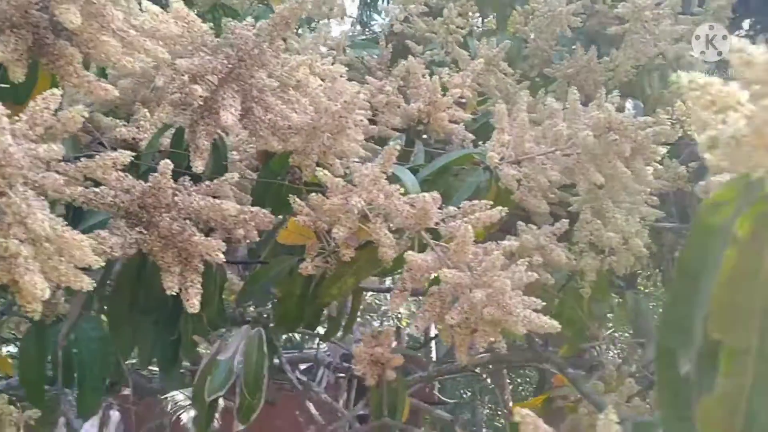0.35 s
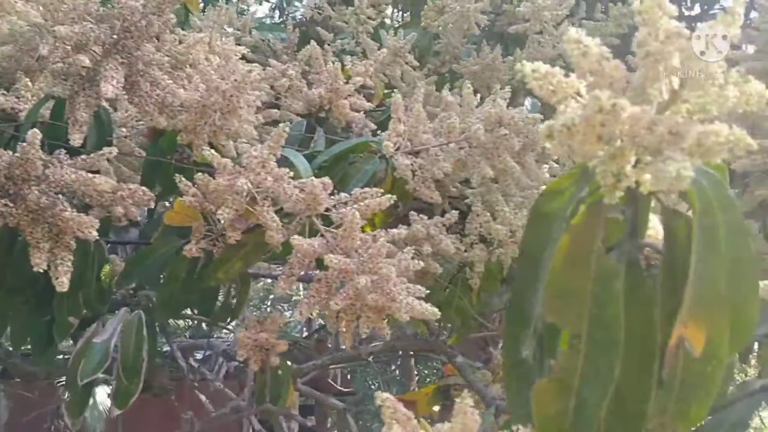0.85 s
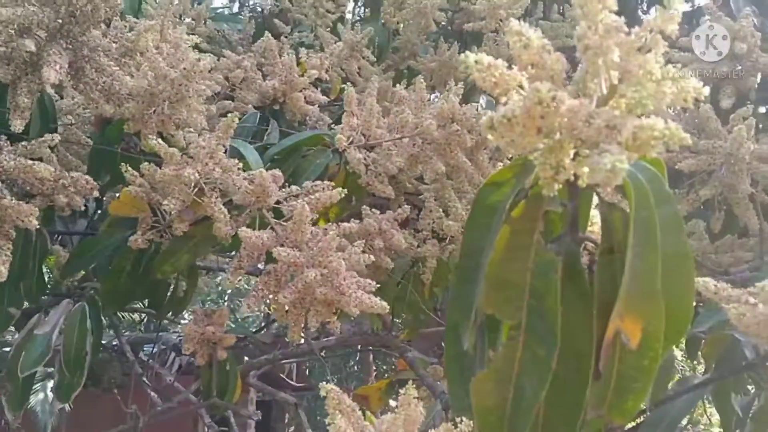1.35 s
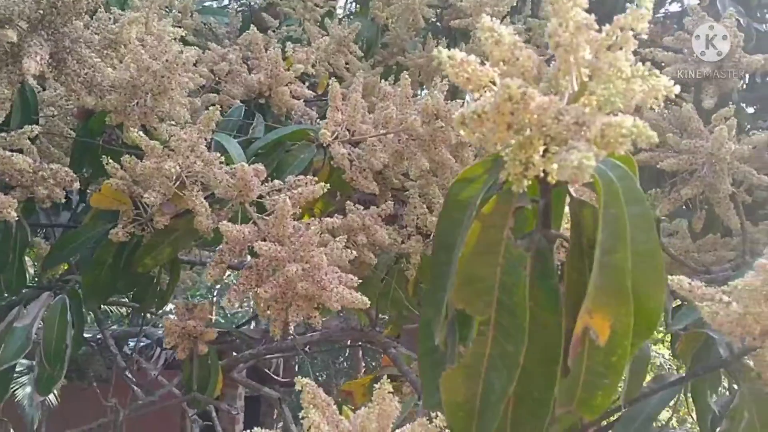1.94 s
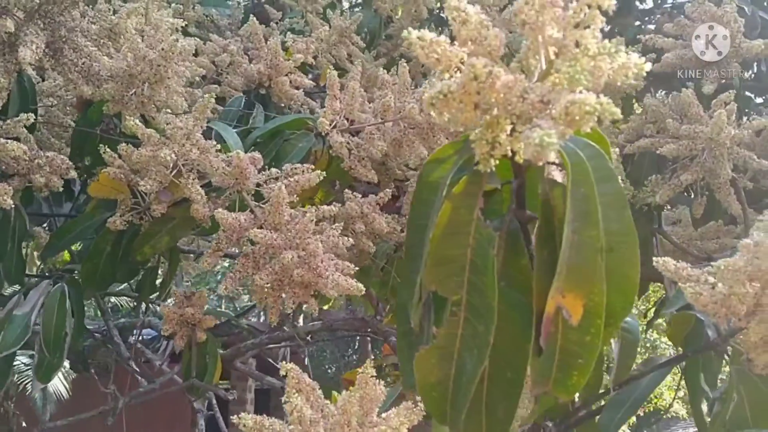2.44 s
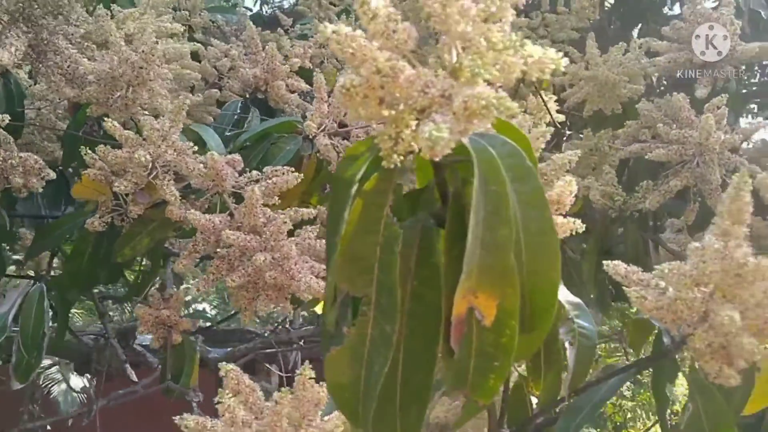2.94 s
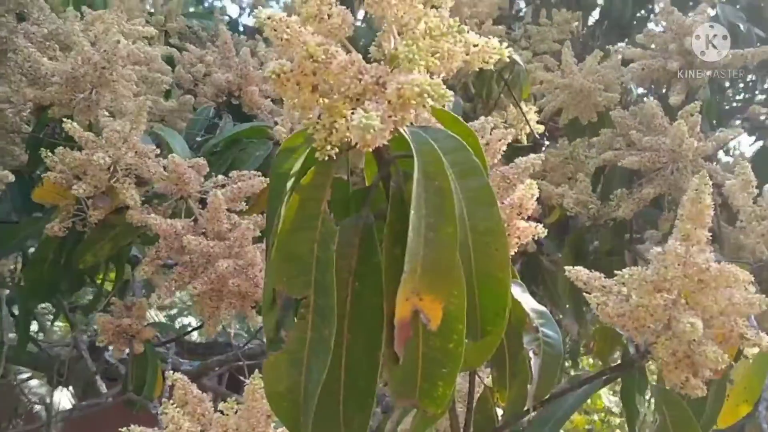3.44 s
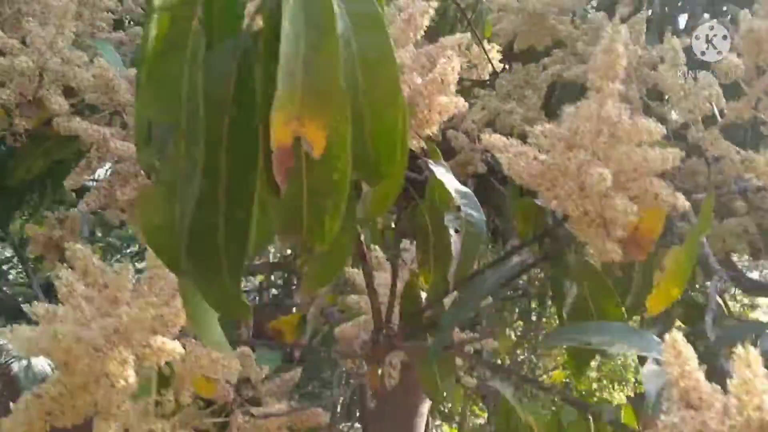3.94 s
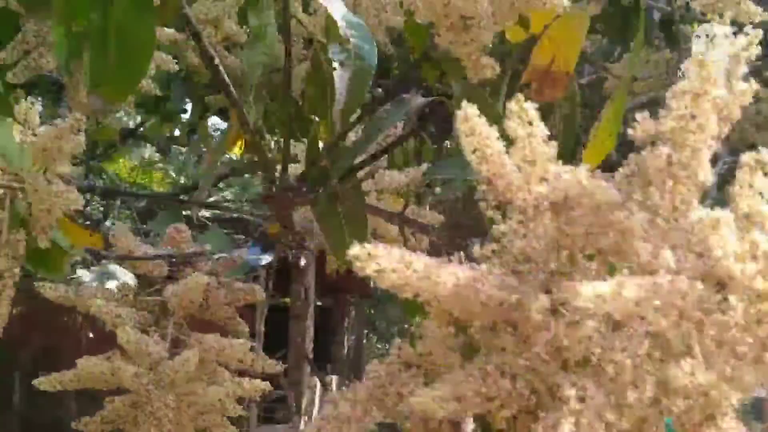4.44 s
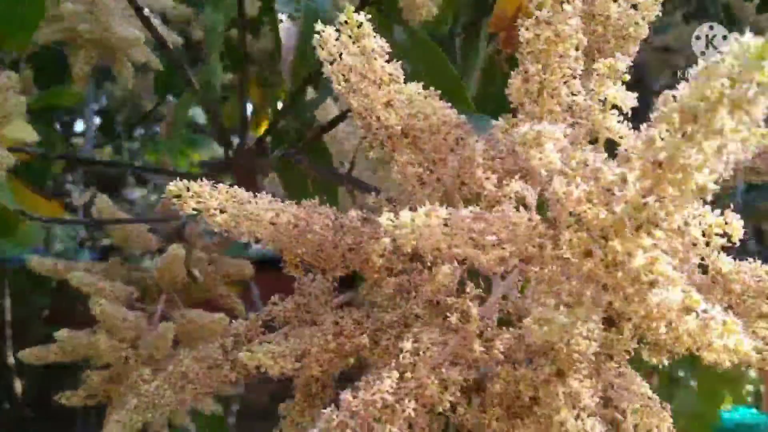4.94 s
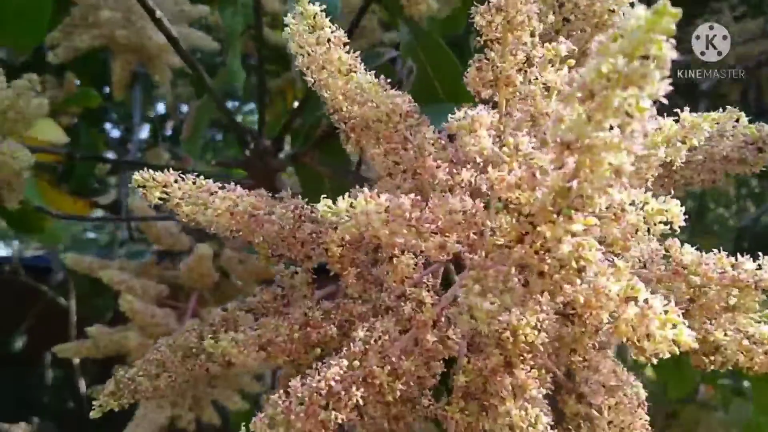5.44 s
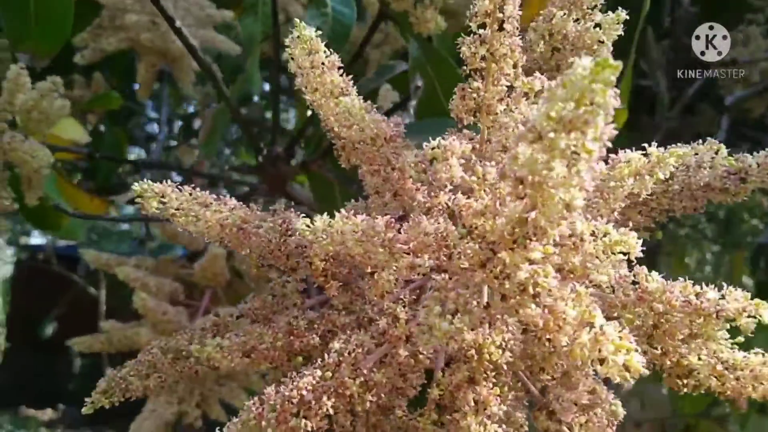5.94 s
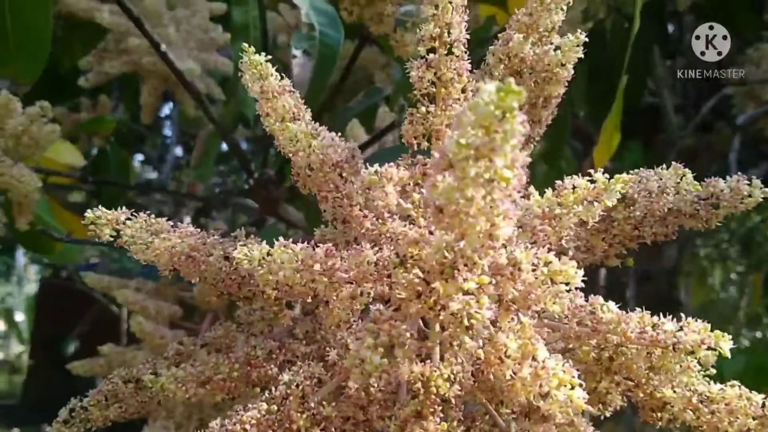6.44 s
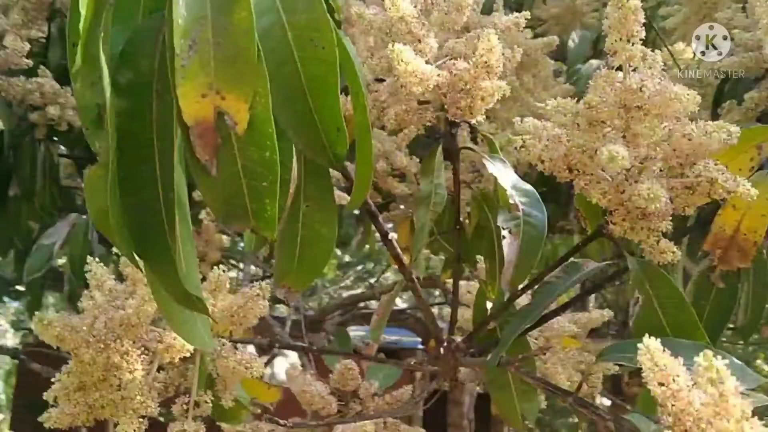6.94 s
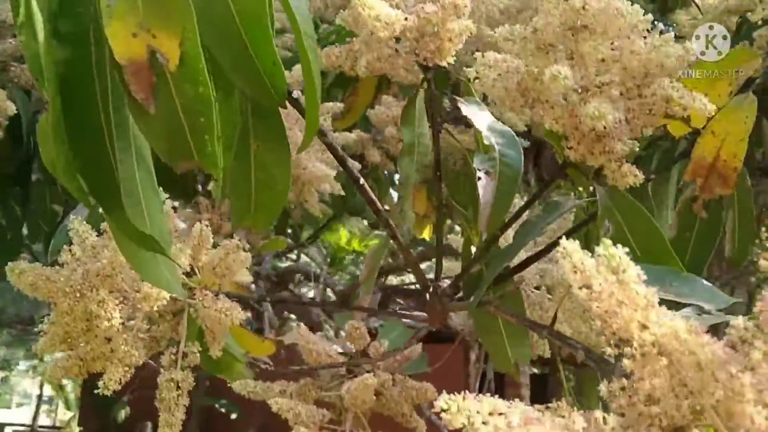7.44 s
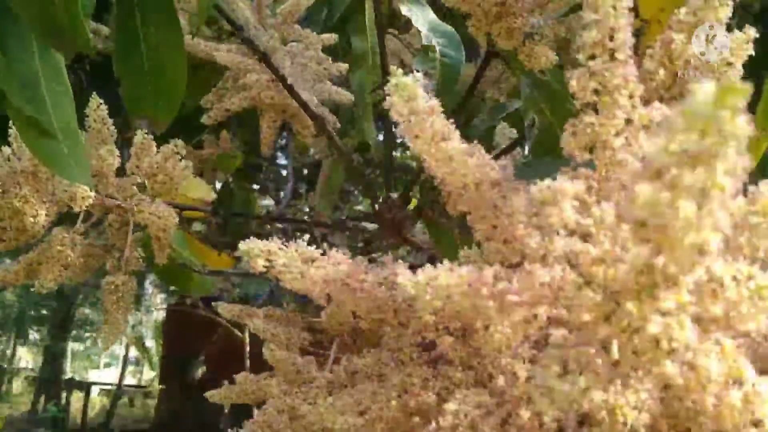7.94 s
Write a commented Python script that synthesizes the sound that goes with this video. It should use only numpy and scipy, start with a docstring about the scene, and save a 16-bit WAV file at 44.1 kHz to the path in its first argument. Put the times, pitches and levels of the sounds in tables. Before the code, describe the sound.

A leafy garden with a low airy wash, wavering far hum and soft wind puffs on the microphone. Distant crows caw, slow footsteps crunch over dry ground with small snaps, and thin high insects buzz in bouts. Small birds give quick arched phrases and falling chips. Near seven seconds everything cuts to silence briefly, then the air returns and a closer bird alternates rising whistles with sharp falling ticks.

```python
"""A garden with trees: small birds call over a far hum, insects, light wind and puffs on the microphone.
Crows caw far off (pulses ringing a throat) and feet crunch over dry ground (shaped noise and grains).
After a short silence the recorder starts again, nearer to a bird that swaps rising whistles with
falling ticks. Birds are near-sines on pitch curves; air, wind and insects are filtered noise."""
import sys
import numpy as np
from scipy import signal
from scipy.fft import rfft, irfft
from scipy.io import wavfile
from scipy.ndimage import uniform_filter1d

SR = 44100
rng = np.random.default_rng(int(sys.argv[2]) if len(sys.argv) > 2 else 0)


def store_wav(level_fs):
    """Save 16-bit WAV to argv[1]."""
    pcm = np.round(np.clip(np.atleast_2d(level_fs), -1, 1) * 32767)
    wavfile.write(sys.argv[1], SR, pcm.T.astype(np.int16))


def magnitude_from_level(level_db):
    """Linear magnitude for a level in decibels (20 dB per decade)."""
    exponent = np.asarray(level_db, float) / 20
    return 10 ** exponent


N = 356769
STOP_S, RESTART_S = 6.745, 7.048  # the recorder stops, then starts again


def evened(x):
    """Normalisation: scales to rms 1."""
    return x / np.sqrt(np.mean(x ** 2) + 1e-20)


def add(mix, s, sound):
    """Superposition: sums a sound into the mix from time s."""
    part = mix[round(s * SR):][:len(sound)]
    part += sound[:len(part)]


def columns(rows, t=None):
    """Linear interpolation: reads every column of a curve table at each sample."""
    s, *cols = np.transpose(rows)
    t = np.arange(s[0], s[-1], 1 / SR) if t is None else t
    return [np.interp(t, s, c) for c in cols]


def coloured(x, points):
    """Spectral filtering: weights a signal by a curve of f/Hz, level/dB."""
    f, db = np.transpose(points)
    hz = np.fft.rfftfreq(len(x), 1 / SR)
    curve_db = np.interp(np.log(hz + 1), np.log(f + 1), db)
    return irfft(rfft(x) * magnitude_from_level(curve_db), len(x))


def resonate(x, hz, width):
    """Moving resonance by heterodyning: shifts hz down to zero, smooths twice, shifts back."""
    turn = np.exp(2j * np.pi * np.cumsum(hz * np.ones(len(x))) / SR)
    r = np.exp(-np.pi * width / SR)
    smooth = signal.lfilter([(1 - r) ** 2], [1, -2 * r, r * r], x / turn)
    return 2 * (turn * smooth).real


def wander(size, hz):
    """Low-passed random process of rms 1, slower than about hz."""
    noise = rng.standard_normal(size + SR)
    return evened(signal.lfilter(*signal.butter(2, hz, fs=SR), noise)[SR:])


def foliage(x, t60, wet_db):
    """Diffuse scattering: leaves and walls return sparse random reflections that decay."""
    t = np.arange(SR // 2) / SR
    hits = rng.choice([-1., 1.], len(t)) * (rng.random(len(t)) < .05)
    tail = hits * magnitude_from_level(-60 * t / t60) * (t > .004)
    return x + magnitude_from_level(wet_db) * signal.oaconvolve(x, tail / np.linalg.norm(tail))[:N]


def echoed(x, lag_s, db):
    """Specular reflection: a near wall returns one delayed copy."""
    lag = round(lag_s * SR)
    return x + magnitude_from_level(db) * np.r_[np.zeros(lag), x[:-lag]]


def whistle(hz, db, second_db=-200, third_db=-200):
    """Harmonic synthesis: a near-sine with soft ends and faint overtones."""
    phase = 2 * np.pi * np.cumsum(uniform_filter1d(hz, size=100)) / SR
    partials = enumerate([db, second_db, third_db], 1)
    tone = sum(magnitude_from_level(level) * np.sin(k * phase) for k, level in partials)
    return np.sqrt(2) * tone * signal.windows.tukey(len(hz), min(1, 260 / len(hz)))


def sing(shapes, times, second_db=-60, third_db=-60):
    """Frequency modulation: repeats a set of pitch curves, each time a shade sharp or flat."""
    pivot_hz = 4400  # the pitch that stays when the span shrinks
    overtone_db_per_octave = 38  # overtones fade as a note falls
    out = np.zeros(N)
    bends = 1 + 0.0018 * rng.standard_normal(len(times))
    for (s, level_db, *span), bend in zip(times, bends):
        for shape in shapes:
            hz, db = columns(shape)
            if span:
                hz = pivot_hz + span[0] * (hz - pivot_hz)
            overtone_db = db + overtone_db_per_octave * np.log2(hz / hz.max())
            note = whistle(bend * hz, db, overtone_db + second_db, overtone_db + third_db)
            add(out, s + shape[0][0], magnitude_from_level(level_db) * note)
    return out


# Spectra of the wash before the stop and after the restart: f/Hz, relative level/dB
AIR_SPECTRUM = [(20, -27), (60, -8), (130, -2.5), (240, -11), (400, -17), (600, -16), (1100, -17),
                (1800, -24), (2300, -23.5), (4200, -30), (5200, -36), (7000, -33.5), (9200, -30),
                (10700, -39), (15500, -37)]
AIR_AFTER_SPECTRUM = [(12, -2), (30, 8.5), (70, 0), (113, -4.5), (400, -10.5), (820, -13.5), (1100, -18.5),
                      (1380, -25), (2540, -27.5), (3200, -28), (4000, -36.5), (6000, -36), (7500, -32.5),
                      (9860, -39), (11000, -42.5), (15500, -39)]
# Drift of the wash before the stop: t/s, mean level/dB
AIR_LEVEL = [(0, -66), (.8, -65), (3.3, -64.5), (3.9, -65.5), (5.3, -64.5), (6.1, -67.5), (6.75, -66.5)]
# Swell of the wash after the restart: t/s, gain/dB
AFTER_SWELL = [(7.05, -4.5), (7.3, -5.5), (7.7, -2), (8.09, -2.5)]


def air(points, db):
    """Broadband ambience: far town and leaves as shaped noise whose level drifts a little."""
    noise = coloured(rng.standard_normal(N), points)
    above = signal.sosfilt(signal.butter(4, 150, "high", fs=SR, output="sos"), noise)
    # the level counts only the sound above 150 Hz
    return magnitude_from_level(db + 1.58 * wander(N, 4.5)) * noise / np.std(above)


# Far hum: t/s, level/dB
HUM_LEVEL = [(0, -62), (4.4, -59.5), (5.2, -62.5), (6.75, -64.5)]
# Low puffs of air on the microphone: centre t/s, peak level/dB (of the force), half length to 1/e/s
PUFFS = [(.36, -58, .12), (1.02, -48, .06), (1.16, -55, .025), (1.31, -50, .035), (1.43, -54, .035),
         (2.19, -53, .08), (2.63, -49, .035), (2.76, -47, .04), (2.88, -55, .08), (3.16, -49, .035),
         (4.46, -51, .09), (4.565, -42, .03), (4.64, -48, .04), (4.74, -50, .035), (4.9, -56, .08),
         (5.62, -53, .06), (5.86, -55, .05), (6.1, -55, .12), (6.4, -54, .04), (6.64, -49, .07)]
# Thumps of air, one push and pull of the membrane: centre t/s, peak level/dB, width/s
THUMPS = [(2.06, -36, 0.0042), (4.574, -32.5, .007)]


def low_air_and_hum(t):
    """Turbulent pressure: a lumpy breeze, puffs and thumps on the microphone, and a wavering far hum."""
    hum_hz, breeze_db, lump_db, lump_hz = 116, -58.5, 3, 8
    lumps = coloured(rng.standard_normal(N), [(3, -20), (15, 2), (30, 2), (60, -5), (110, -13),
                                              (200, -26), (400, -55), (1000, -90)])
    force = magnitude_from_level(breeze_db + lump_db * wander(N, lump_hz))
    force = force + sum(magnitude_from_level(db) * np.exp(-((t - s) / half) ** 2) for s, db, half in PUFFS)
    thumps = np.zeros(N)
    for s, db, width in THUMPS:
        x = (t - s) / width
        thumps -= magnitude_from_level(db) * 2.35 * x * np.exp(-x ** 2)  # 2.35 brings the peak to 1
    hum = np.sin(2 * np.pi * np.cumsum(hum_hz + 3.58 * wander(N, 6.3)) / SR)
    hum = hum * (1 + 0.35 * wander(N, 12))
    return thumps + force * evened(lumps) + magnitude_from_level(columns(HUM_LEVEL, t)[0]) * evened(hum)


# Bouts of insect song: t/s, length/s, first level/dB, last level/dB (before waver), centre f/Hz
INSECT_BOUTS = [(0, 0.6, -73, -79, 9660), (0.69, 0.85, -78.5, -72.5, 9500), (1.893, 0.98, -80, -70, 9640),
                (2.98, 1.5, -73.5, -91, 9440), (3.956, 0.54, -85, -74, 9600), (4.546, 0.21, -80, -76, 9350),
                (4.9, 1.06, -75.5, -77, 9250), (6.005, 0.74, -78.5, -71.5, 9270),
                (7.107, 0.97, -84.5, -77.5, 9655)]


def insects(t):
    """Stridulation: fast noise pulses ring near 9 kHz, over a thin steady band below."""
    rest_db, edge_s, waver_db, drift_hz = -87.5, 0.1, 1.5, 120
    thin_hz, thin_db = 7190, -88  # a second, thinner insect
    starts, _, _, _, centres = np.transpose(INSECT_BOUTS)
    level = np.full(N, magnitude_from_level(rest_db))
    for s, length, first_db, last_db, _ in INSECT_BOUTS:
        edges = np.clip(np.minimum(t - s, s + length - t) / edge_s + .5, 0, 1)
        bout = edges * magnitude_from_level(first_db + (last_db - first_db) * (t - s) / length)
        level = np.maximum(level, bout)
    latest = np.maximum(np.searchsorted(starts, t) - 1, 0)
    hz = uniform_filter1d(centres[latest], size=4000) + drift_hz * wander(N, 2)
    turns = np.cumsum(140 * (1 + 0.064 * wander(N, 2.7))) / SR  # about 140 pulses a second
    gate = np.exp(-(turns % 1) / 0.43)
    buzz = evened(resonate((0.5 + gate) * rng.standard_normal(N), hz, 900))
    thin = evened(resonate(rng.standard_normal(N), thin_hz, 300))
    return level * magnitude_from_level(waver_db * wander(N, 4.44)) * buzz + magnitude_from_level(thin_db) * thin


# Far flock: t/s, gain/dB on the notes
FLOCK_GAIN = [(0, -106), (4.9, -100), (5.15, -86), (5.4, -84), (5.55, -87), (6.0, -87), (6.3, -97),
              (6.75, -94)]


def twitter(t):
    """Random superposition: a far flock of short rising notes around two pitches."""
    out, u = np.zeros(N), np.arange(600) / SR
    draws = rng.random((450, 4)) * [STOP_S, 700, 2, 6] + [-0.5, 4014, 0.0, 1.0]
    for s, hz, bend, db in draws:
        base_hz = 4200 if hz < 4350 else 4650
        glide_hz = base_hz + 0.5 * (hz % 350 - 175) + 12000 * bend * u
        add(out, s, whistle(glide_hz, db) * np.hanning(len(u)))
    flicker = 1 + .8 * wander(N, 120)
    return foliage(magnitude_from_level(columns(FLOCK_GAIN, t)[0]) * out * flicker, .25, -2)


# Caws: t/s, length/s, second-partial f/Hz before scoop and sag, level/dB before the envelope
# and the final gain, brightness/(dB per octave)
CAWS = [(.165, 0.27, 1294, -62.5, 2.5), (0.422, .11, 1249, -65, 5), (2.0, 0.29, 1269, -59.5, -4)]
# Resonances of the crow's open throat, before the brightness tilt: f/Hz, level/dB
CROW_THROAT = [(500, -40), (950, 3.5), (1200, 1.5), (1650, 4.5), (2250, -1), (2800, -11.5), (3500, -10.5),
               (4200, -20)]


def crow():
    """Source-filter voice: unsteady throbbing pulses pass through an open throat, far away."""
    scoop_depth, scoop_share, sag_depth = 0.3, .3, .17  # pitch scoops up from below, then sags
    start_db, end_db = -2, -1.5
    hoarse, throb, jitter = 0.42, .35, .022  # hoarse: share of rough pulses in the voice
    out = np.zeros(N)
    for s, length, top_hz, level_db, tilt in CAWS:
        t = np.arange(round(length * SR)) / SR
        n = len(t)
        scoop, sag = np.exp(-t / (scoop_share * length)), (t / length) ** 2.5
        hz = top_hz * (1 - scoop_depth * scoop - sag_depth * sag)
        db = level_db + start_db * scoop + end_db * sag
        turns = np.cumsum(hz / 2 * (1 + jitter * wander(n, 160))) / SR
        folds = sum(np.cos(2 * np.pi * k * turns) for k in range(1, 9)) * (1 + throb * wander(n, 90))
        rough = np.exp(-(turns % 1) / 0.097) * (1 + wander(n, 560))
        drive = (1 - hoarse) * evened(folds) + hoarse * evened(rough)
        throat = [(f, level + tilt * np.log2(f / 1400)) for f, level in CROW_THROAT]
        voice = evened(coloured(drive, throat))
        add(out, s, magnitude_from_level(db) * voice * signal.windows.tukey(n, .1))
    return foliage(magnitude_from_level(-2) * out, .3, -4)


# Rasping calls of a second crow: t/s, length/s, throat from f/Hz, to f/Hz, starting level/dB
RASPS = [(3.879, .23, 1520, 1860, -66.5), (4.785, .28, 1618, 1449, -65)]


def rasps():
    """Source-filter voice: ragged pulses ring a narrow throat, far away."""
    jitter, width_hz, low_width_hz, low_db = .2, 700, 300, -7
    air_noise, stutter_db, stutter_hz = .4, 1.5, 90  # the voice catches and lets go
    out = np.zeros(N)
    for s, length, from_hz, to_hz, db in RASPS:
        u = np.arange(round(length * SR)) / (length * SR)
        n = len(u)
        hz = from_hz + (to_hz - from_hz) * np.sqrt(u)
        turns = np.cumsum(hz / 3 * (1 + jitter * wander(n, 200))) / SR
        ragged = 1 + .6 * wander(n, 300) + air_noise * rng.standard_normal(n)
        drive = np.exp(-(turns % 1) / 0.13) * ragged
        drive = drive * magnitude_from_level(stutter_db * wander(n, stutter_hz))
        voice = resonate(drive, hz, width_hz)
        voice = voice + magnitude_from_level(low_db) * resonate(drive, hz * 2 / 3, low_width_hz)
        voice = evened(coloured(voice, [(600, -30), (900, 2.5), (2000, 1.5), (2600, -23)]))
        add(out, s, magnitude_from_level(db - 2.5 * u) * voice * signal.windows.tukey(n, .16))
    return foliage(out, .3, -3)


# Steps: t/s, heel level/dB, gravel level/dB (before their envelopes), delay of the gravel/s
STEPS = [(0.299, -63, -65.5, 0.11), (0.641, -83, -73, 0.04), (1.45, -64.5, -68, 0.081),
         (2.081, -61, -66, 0.21), (2.935, -60, -67, 0.098), (3.485, -56, -63, 0.12),
         (4.185, -57, -66.5, 0.12), (4.92, -54, -66.5, 0.12), (5.68, -59, -67.5, 0.14),
         (6.47, -59, -67.5, 0.15)]
# Spectrum of the heel's hiss: f/Hz, relative level/dB
HEEL_SPECTRUM = [(300, -23.5), (1400, 3.5), (2000, -6.5), (2600, 2), (3300, -6.5), (5000, -10.5),
                 (8000, -9.5), (12000, -13), (15500, -14.5)]
# Small dry snaps: t/s, level/dB before the decay, centre f/Hz
SNAPS = [(1.734, -75, 2170), (1.7579, -62, 6560), (1.9194, -59, 1230), (2.2744, -61.5, 1730),
         (2.2944, -76, 2360), (4.2844, -53, 1880), (4.5592, -58, 2700), (5.0583, -56, 2360),
         (5.8094, -60, 2200), (6.5546, -52, 1600)]


def steps():
    """Impact and granular noise: the heel hisses, then grit crunches, brighter as the foot rolls off."""
    out, t = np.zeros(N), np.arange(round(.45 * SR)) / SR
    n = len(t)
    for s, heel_db, gravel_db, delay in STEPS:
        hiss = evened(coloured(rng.standard_normal(n), HEEL_SPECTRUM))
        decay = 0.7 * np.exp(-t / 0.0081) + .5 * np.exp(-t / 0.13)
        heel = hiss * np.minimum(t / 0.014, 1) * magnitude_from_level(1.2 * wander(n, 80)) * decay
        sizes = magnitude_from_level(1.8 * np.minimum(rng.exponential(1, n), 3))
        # about 1300 grains a second
        grains = sizes * (rng.random(n) < 1300 / SR) * rng.choice([-1., 1.], n)
        roll = np.exp(-((t - delay) / np.where(t < delay, .05, .12)) ** 2)
        crunch = evened(resonate(grains, 1900 + 3000 * t, 950))
        gravel = crunch * roll * magnitude_from_level(2.3 * wander(n, 30))
        add(out, s, magnitude_from_level(heel_db) * heel + magnitude_from_level(gravel_db) * gravel)
    t = t[:400]
    for s, db, hz in SNAPS:
        ring = evened(resonate(rng.standard_normal(len(t)), hz, 0.73 * hz))
        add(out, s, magnitude_from_level(db) * ring * np.exp(-t / 0.0028))
    return out


# Single whistles of other birds, and at 4.69 s the low lead-in of the last rasping caw:
# t/s, length/s, from f/Hz, to f/Hz, level/dB at mid-note before flutter
WHISTLES = [(3.136, 0.18, 7350, 7200, -80), (3.264, .09, 7150, 6300, -79), (5.237, 0.19, 3310, 3504, -76),
            (5.4, 0.015, 4150, 4250, -76), (5.6, .025, 4200, 4200, -78), (5.21, .025, 4200, 4210, -76),
            (5.19, .05, 4040, 4020, -80), (5.43, .025, 4230, 4230, -78), (4.69, .14, 960, 950, -74.5),
            (6.2, .03, 3300, 3320, -79), (5.61, .03, 3990, 3960, -81), (5.47, .04, 3830, 3900, -81),
            (5.87, 0.049, 4120, 4220, -74), (6.13, 0.14, 3470, 3550, -80.5), (6.1, 0.27, 2850, 2770, -85),
            (6.325, .05, 3370, 3350, -78), (6.42, 0.12, 3520, 3670, -77), (7.344, 0.0107, 2100, 3000, -60),
            (7.442, 0.032, 3560, 4600, -65)]
# A reedy slide with an overtone: t/s, f/Hz, level/dB, overtone level/dB
SLIDE = [(7.342, 1400, -72, -90), (7.35, 1500, -73, -75), (7.398, 2000, -64.5, -67),
         (7.406, 2240, -57.5, -100), (7.42, 2690, -53.5, -110), (7.44, 3150, -67, -110)]


def single_glides():
    """Linear glides: single whistles of other birds, a rasping caw's low lead-in, and the reedy slide."""
    ends_db, flutter_db = -2.5, 2.2  # a glide starts and ends softer
    out = np.zeros(N)
    for s, length, from_hz, to_hz, db in WHISTLES:
        u = np.arange(round(length * SR)) / (length * SR)
        level_db = db + ends_db * (2 * u - 1) ** 2 + flutter_db * wander(len(u), 59.8)
        add(out, s, whistle(from_hz + (to_hz - from_hz) * u, level_db))
    add(out, SLIDE[0][0], whistle(*columns(SLIDE)))
    return out


# Note shapes of a phrase, the first one its high arch: t after the start/s,
# f/Hz before span and detuning, level/dB before the gain
PHRASE_SHAPES = [
    [(.01, 6230, -81), (.022, 6860, -76), (.035, 6690, -72), (.045, 6440, -71), (.053, 5920, -64.5)],
    [(.064, 4200, -74.5), (.075, 4480, -81.5), (.086, 4670, -67), (.094, 4320, -63.5), (.099, 4580, -80.5),
     (.108, 4600, -64.5)],
    [(.108, 3430, -63.5), (.113, 3490, -77.5), (.118, 3800, -68), (.125, 3880, -53.5)],
    [(.126, 4670, -73.5), (.135, 4100, -57.5), (.145, 3586, -63), (.157, 3280, -65), (.17, 2800, -67)],
]
# Phrases: t/s, gain/dB, pitch span as a share of the shape
PHRASES = [(1.716, 3, 1.), (2.024, 5.5, 0.93), (2.327, 5.5, 1.), (2.624, 6, 0.97), (5.559, -3, .85),
           (5.837, 0, 0.88)]
# The high arch that opens each phrase, a little loose in time: t/s, gain/dB
ARCHES = [(1.723, 0), (2.024, 5.5), (2.329, 7.5), (2.626, 9), (5.565, 0), (5.84, -5)]


def phrases():
    """Frequency modulation: a high arch opens each phrase of quick lower notes."""
    return sing(PHRASE_SHAPES[1:], PHRASES) + sing(PHRASE_SHAPES[:1], ARCHES)


# Shape of a falling chip: t after the start/s, f/Hz at full depth, level/dB before the gain
CHIP_SHAPE = [(.005, 7270, -95), (.012, 8700, -69), (.02, 7380, -66.5), (.03, 6630, -61), (.04, 5960, -64),
              (.05, 5520, -65.5), (.058, 5400, -60.5), (.065, 5150, -88)]
# Falling chips: t/s, gain/dB, depth of the fall as a share of the shape
CHIPS = [(.739, -21, .8), (.906, -24, 0.91), (1.465, 4.5, 0.99), (1.619, 3.5, 0.92), (3.217, -2, 0.85),
         (3.385, 1, 0.66), (4.735, -18, 0.62), (5.37, 4.5, 1.), (5.53, 2, 0.98), (6.679, -18.5, 0.87)]


def chips():
    """Frequency sweep and reflection: falling chips with an overtone, returned by a near wall."""
    out = np.zeros(N)
    hz, db = columns(CHIP_SHAPE)
    for s, level_db, depth in CHIPS:
        fall_hz = hz[-1] + depth * (hz - hz[-1])
        add(out, s + CHIP_SHAPE[0][0], magnitude_from_level(level_db) * whistle(fall_hz, db, db - 17.5))
    return foliage(echoed(out, 0.0055, -1.8), 0.15, -9.5)


# Shapes of the rising whistle and the falling tick: t after the start/s,
# f/Hz before detuning, level/dB before the gain
RISE_SHAPE = [(.01, 2186, -82), (.04, 2330, -69), (.07, 2530, -61.5), (.1, 2940, -50.5), (.113, 3230, -44),
              (.12, 3300, -46), (.128, 3300, -53), (.138, 3260, -50.5), (.146, 3120, -49), (.15, 3080, -63)]
TICK_SHAPE = [(.005, 5590, -57), (.012, 5360, -53), (.017, 5170, -56), (.021, 4810, -58.5),
              (.025, 4250, -57), (.028, 3500, -56), (.031, 2940, -63.5), (.034, 2750, -82)]
# When each is sung: t/s, gain/dB
RISES = [(7.69, -1), (7.304, -3), (6.958, -8.5)]
TICKS = [(7.93, 1.9), (7.189, -1.7), (7.542, -1.5)]


def near_bird():
    """Frequency modulation: rising whistles alternate with falling ticks rich in a third harmonic."""
    ticks = sing([TICK_SHAPE], TICKS, second_db=-28.0, third_db=-13)
    return foliage(sing([RISE_SHAPE], RISES) + echoed(ticks, .011, -10.5), 0.32, -6)


def scene():
    """Superposition of sources: two moments in the same garden."""
    t = np.arange(N) / SR
    before = air(AIR_SPECTRUM, columns(AIR_LEVEL, t)[0]) + low_air_and_hum(t)
    before = before + twitter(t) + crow() + rasps() + steps()
    after = air(AIR_AFTER_SPECTRUM, -61.5 + columns(AFTER_SWELL, t)[0])
    calls = foliage(phrases() + single_glides(), 0.46, -5.0) + chips() + near_bird()
    return (np.where(t < STOP_S, before, after) + insects(t) + calls)[None]


def low_pass(x):
    """Removes everything above the highest recorded frequency."""
    return signal.sosfilt(signal.butter(12, 16730, fs=SR, output="sos"), x)


# Microphone response, port resonance and band edge: f/Hz, level/dB
MIC_RESPONSE = [(20, -2), (12000, 0.5), (14000, 2.5), (15100, 9.5), (15450, -6), (15550, -64)]


def record(dry):
    """Transient response: silence from stop to restart, then the input offset swings and settles."""
    t = np.arange(N) / SR
    on = np.clip((STOP_S - t) / .004, 0, 1) + np.clip((t - RESTART_S) / .001, 0, 1)
    since = np.maximum(t - RESTART_S, 0)
    offset = -.052 * (np.exp(-since / .6) - np.exp(-since / .1))
    mix = coloured(dry[0], MIC_RESPONSE)[None] * on + offset
    return low_pass(mix)


dry = scene()
out = record(dry)
store_wav(out)
```